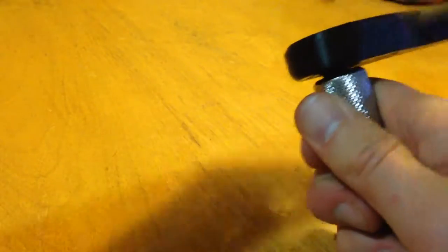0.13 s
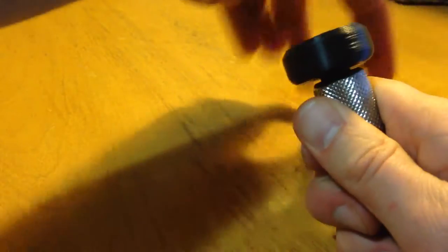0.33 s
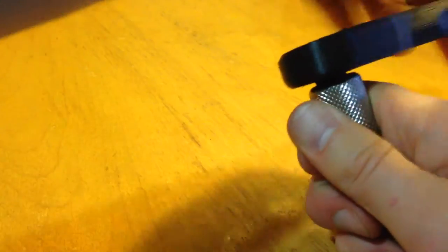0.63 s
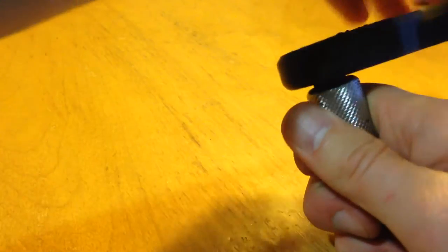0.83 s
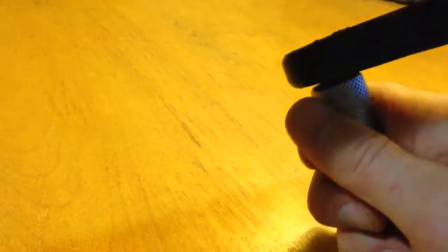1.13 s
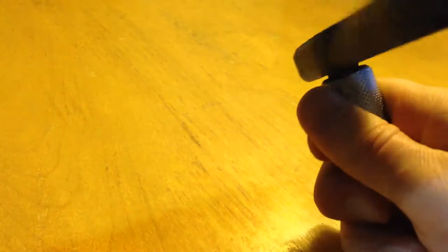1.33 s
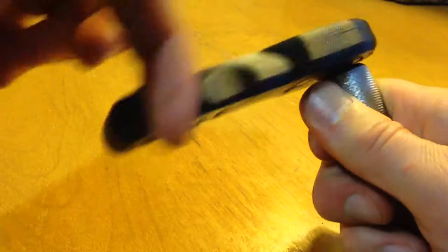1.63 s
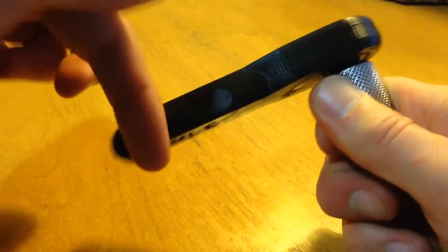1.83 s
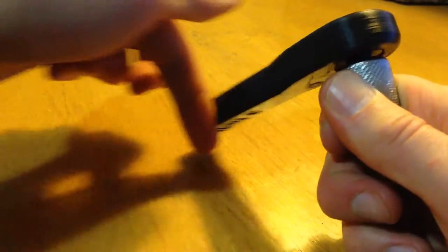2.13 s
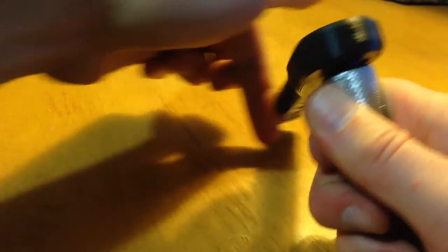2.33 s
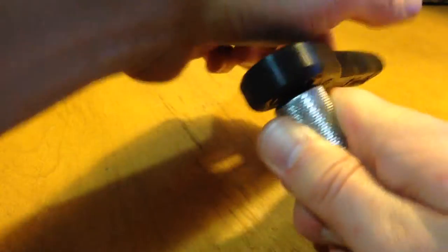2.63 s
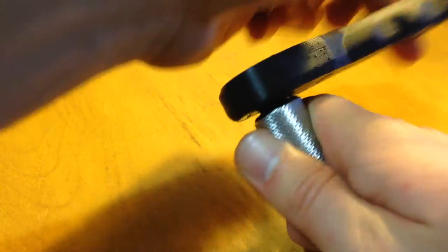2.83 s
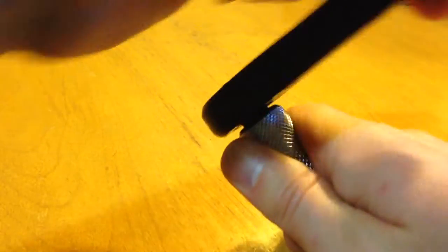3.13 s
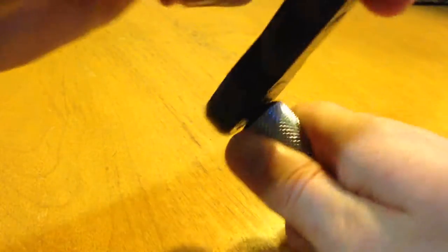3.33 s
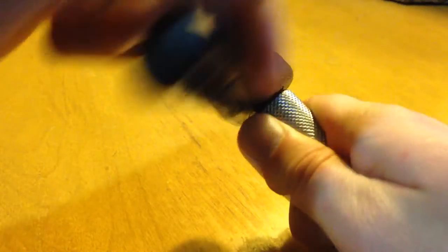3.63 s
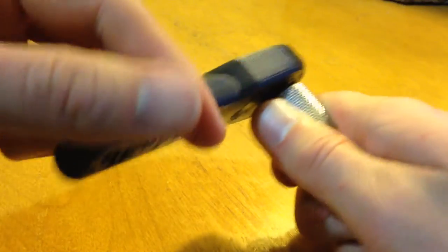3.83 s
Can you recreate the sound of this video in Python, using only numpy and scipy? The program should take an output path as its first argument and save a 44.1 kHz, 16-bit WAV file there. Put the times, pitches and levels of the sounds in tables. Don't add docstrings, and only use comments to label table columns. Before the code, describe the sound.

A hand-turned plastic ratchet wrench rattles softly, then snaps a few isolated, bright clicks close up

```python
import sys
import numpy as np
from scipy import signal
from scipy.fft import rfft, irfft, next_fast_len
from scipy.io import wavfile
from scipy.ndimage import uniform_filter1d, map_coordinates

SR = 44100
rng = np.random.default_rng(int(sys.argv[2]) if len(sys.argv) > 2 else 0)


def digitize_waveform(pressure):
    field = np.atleast_2d(pressure).T
    bounded = np.clip(field, -1, 1)
    quanta = np.round(bounded * 32767).astype(np.int16)
    wavfile.write(sys.argv[1], SR, quanta)


def gain_from_decibels(decibels):
    exponent = np.asarray(decibels, float) / 20
    return 10 ** exponent


N = 176400

# (frequency [Hz], density [dB per Hz])
HISS_COLOUR = [(250, 0.5), (400, -2), (630, -9), (1000, -11.5), (2000, -18.5), (3200, -26), (6000, -30),
               (15500, -38.5)]
# (frequency [Hz], width [Hz], level [dB])
HUM = [(50, 16, -68.5), (83.9, 22, -71.5), (151, 20, -61.5), (220.6, 8.3, -64.5), (373, 22, -71),
       (977, 20, -78), (1610, 36, -84.5)]
# (time [s], level [dB])
DRONE = [(0, -76), (.15, -72), (.21, -50.5), (.36, -53.5), (.5, -59), (1.1, -68.5), (1.4, -57.5),
         (1.78, -69), (2.08, -58), (2.16, -67), (2.48, -57), (2.6, -64.5), (3.07, -56), (3.14, -67.5),
         (3.34, -57), (3.87, -74), (4, -62)]
# (frequency [Hz], t60 [s])
ROOM_DECAY = [(500, .25), (1500, 0.24), (4000, 0.23), (8000, .25), (15000, .2)]
# (frequency [Hz], level [dB])
ROOM_COLOUR = [(400, -2), (1500, 6.5), (5000, 9.5), (10000, 3.5), (15000, 3.5)]
# (time [s], level [dB])
THUMPS = [
    (0.188, -53),
    (2.454, -42),
    (3.021, -49.5),
    (3.698, -48),
]
# (frequency [Hz], width [Hz], level [dB])
BODY = [(787, 520, -12), (1400, 320, -7.5), (2190, 280, -3.5), (3400, 620, -5.5), (4500, 700, -4.5),
        (5500, 800, -4.5), (6500, 270, 2), (6540, 440, -8), (8400, 900, -6.5), (9430, 810, -11),
        (10360, 530, -14), (13100, 1500, -28.5), (14600, 1500, -28)]
# (time [s], level [dB])
RUB = [(0, -54), (.1, -60.5), (.25, -59), (.33, -66.5), (.38, -85), (.51, -85), (.55, -62), (.6, -79),
       (.7, -100), (3.65, -98), (3.679, -61.5), (3.7, -92)]
# (frequency [Hz], width [Hz], level [dB])
SCUFF = [(880, 350, -2), (1300, 300, -10), (1800, 400, -6.5), (5200, 340, -4)]
CORE_HZ = 3770, 3620, 6350, 5400
# (time [s], level [dB], t60 [s])
CORE_RINGS = [
    [(.55, -62, .1), (.565, -64, .1), (.622, -55, .3)],
    [(1.915, -80, .3), (1.975, -78, .15), (2.005, -79, .2), (2.456, -53, .2), (2.9795, -26, .04),
     (2.9856, -31, .04), (3.035, -58, .15), (3.6876, -22, .022)],
    [(1.905, -75, .1), (2.005, -73, .15), (2.46, -60, .15), (3.71, -62, .3)],
    [(3.035, -57, .3)],
]
# (frequency [Hz], level [dB], t60 [s])
LOOSE_RING = [
    (5170, -21, .05),
    (2850, -24, .07),
    (1170, -22, .07),
]
# (time [s], level [dB], chatter length [s], leading resonance [Hz], tilt [dB per octave])
TOUCHES = [(.462, -66.5, 0.0059, 6500, 1), (.532, -70, 0.0055, 4940, 0), (.545, -58, .004, 2600, -6),
           (.550, -54, .008, 5200, -2), (.564, -54, 0.007, 6900, -4), (.716, -74, 0.0069, 6040, 6),
           (1.116, -68, 0.004, 6000, 4), (1.706, -74, .016, 12500, 4), (1.885, -78, .008, 6300, 0),
           (1.92, -77, 0.014, 6300, 6), (1.978, -77, .006, 5500, 0), (2.005, -73.5, .02, 6300, 0),
           (2.132, -76.5, .006, 6200, 6), (2.425, -72, .012, 6800, 0), (2.44, -64, 0.01, 8500, -3.5),
           (3.238, -69, 0.0019, 6000, -6), (3.814, -62, 0.0037, 12000, 4)]
# (time [s], level [dB], chatter length [s], leading resonance [Hz], tilt [dB per octave])
KNOCKS = [(.547, -57, 0.0094, 645, -1), (.615, -50, .016, 650, -13), (1.1155, -55, 0.005, 1050, -10),
          (1.122, -63, .03, 950, -10), (2.451, -36, .002, 2400, -7), (2.452, -49, .004, 700, -7),
          (2.458, -47, .006, 1400, -7), (3.0305, -41, 0.0035, 1400, -4), (3.694, -42, .011, 1300, -7),
          (3.699, -30, 0.002, 2000, -7), (3.739, -50, 0.004, 1450, 9)]
# (time [s], level [dB], chatter length [s], leading resonance [Hz])
RATTLE = [(.001, -50, 0.017, 5200), (.008, -54, 0.0041, 3180), (0.0155, -45, 0.005, 880),
          (0.017, -45, 0.003, 1810), (.018, -43, .003, 5600), (.052, -51, 0.005, 5200),
          (.0555, -47, .003, 3700), (0.0565, -43, 0.002, 7000), (0.059, -47, 0.006, 820),
          (.064, -55, .003, 5500), (0.093, -53, 0.005, 4240), (.094, -56.5, .004, 7500),
          (.095, -57.5, 0.0029, 2900), (.105, -54, 0.0062, 1200), (.106, -57, .005, 5000),
          (.112, -64, 0.0094, 1190), (0.133, -53.5, 0.0058, 5300), (.136, -57, .008, 1300),
          (.144, -56, .007, 5000), (0.153, -55, 0.0081, 4750), (0.187, -52.5, 0.005, 5300),
          (.188, -57, .005, 2860), (.2, -54, .004, 6000), (0.199, -53.5, .012, 1150),
          (0.208, -54, .005, 5000), (0.229, -52, 0.008, 5080), (.236, -53, 0.015, 2860),
          (.242, -53, .006, 5100), (.25, -58, .008, 5100), (.271, -58, .006, 7300),
          (.272, -52, 0.0061, 2880), (.277, -57, .008, 1150), (.284, -59, .01, 7400),
          (0.288, -59, 0.005, 2870), (.294, -61, .006, 5100), (0.316, -63.5, 0.005, 2740),
          (.332, -66, .008, 7500)]
# (time [s], level [dB], chatter length [s], leading resonance [Hz], tilt [dB per octave])
SNAPS = [(.6142, -42, 0.0048, 2700, -9), (.6158, -36.5, .002, 4900, -11), (.6168, -32, 0.0054, 3700, -9),
         (.6170, -36, .0035, 3000, -9.5), (.6215, -45, .012, 6960, -8), (.626, -45, 0.0087, 4250, -6),
         (2.4507, -23, 0.00092, 6640, -0.5), (2.4510, -28, .001, 8550, 1),
         (2.4518, -20.5, 0.0013, 4910, -2.5), (2.4538, -30, .0012, 4230, 1.5),
         (2.455, -30, 0.003, 3400, 1.5), (2.4578, -30, .001, 3410, 4), (2.460, -42.5, 0.0091, 4500, -1),
         (2.9787, -33, .0008, 5900, 7), (2.9795, -32, 0.004, 3540, -13.5),
         (2.9852, -27.5, 0.0027, 6020, -0.5), (2.9855, -37, .005, 3630, -5),
         (3.0243, -27, 0.0011, 5190, -5.5), (3.0252, -12, 0.00027, 5360, 2),
         (3.0256, -18, 0.00062, 8400, -1), (3.0263, -25.5, 0.0014, 3440, 2), (3.0275, -26, 0.002, 5990, 1),
         (3.030, -29, 0.0031, 5350, 1), (3.0312, -22.5, 0.00093, 3380, 2.5),
         (3.0325, -31, 0.0041, 2083, 1.5), (3.6755, -58.5, 0.0014, 3510, 4),
         (3.6862, -45.5, 0.0011, 5030, 8), (3.6872, -24.5, 0.00053, 5114, 7),
         (3.6876, -30, 0.0032, 3550, -12), (3.691, -34, 0.0008, 6880, -1), (3.6925, -25, 0.0013, 6500, 4),
         (3.6975, -32.5, 0.001, 2983, 2), (3.6987, -15.5, 0.00043, 7610, 6),
         (3.6990, -16, 0.00096, 10130, 4.5), (3.6993, -16, 0.0012, 3214, -1.5),
         (3.7003, -25.5, 0.0013, 6320, -1), (3.702, -32.5, .003, 5500, 6), (3.708, -39.5, 0.006, 6500, 6),
         (3.7135, -43, .002, 3290, 1)]

HISS_DB, HISS_SWELL_DB, HUM_SWELL_DB = -62.5, 0.25, 3.5
DRONE_HZ, DRONE_WIDTH_HZ = 94, 8.3
ROOM_DB, ROOM_DELAY_S = -21.5, 0.005
THUMP_HZ, THUMP_T60_S = 105, 0.12
RUB_HISS_DB = -19
SPIKE_DB, DROOP_DB = 0.5, 4.5
FALL_S = 0.0007
MODE_SCATTER_DB = 1.5
RATTLE_TILT_DB = -2.5
SOFT_BLOW_DB = -6
SHADE_HZ, SHADE_WIDTH_HZ, SHADE = 12400, 3300, 0.53
TOP_HZ = 15400


def unit(x):
    return x / np.sqrt(np.mean(x ** 2) + 1e-20)


def along(points, hz):
    f, value = np.transpose(points)
    return np.interp(np.log(hz + 1), np.log(f + 1), value)


def wobble(rate):
    knots = rng.standard_normal(int(N * rate / SR) + 4)
    return map_coordinates(knots, [np.arange(N) * rate / SR])


def filtered(x, response):
    m = next_fast_len(len(x) + 4096)
    spectrum = rfft(x, m) * response(np.fft.rfftfreq(m, 1 / SR))
    return irfft(spectrum, m)[..., :len(x)]


def peak(f, hz, width):
    return 1j * f * width / (hz * hz - f * f + 1j * f * width)


def background():
    colour = [(30, -29.5), (200, -4.0)] + list(HISS_COLOUR)
    hiss = unit(filtered(rng.standard_normal(N), lambda f: gain_from_decibels(along(colour, f))))
    out = gain_from_decibels(HISS_DB + HISS_SWELL_DB * wobble(2.1)) * hiss
    for hz, width, db in HUM:
        band = filtered(rng.standard_normal(N), lambda f: peak(f, hz, 2.2 * width) ** 2)
        out += gain_from_decibels(db + HUM_SWELL_DB * wobble(2.5)) * unit(band)
    return out


def drone():
    t = np.arange(N) / SR
    phase = 2 * np.pi * np.cumsum(DRONE_HZ + DRONE_WIDTH_HZ / 2 * wobble(15)) / SR
    level_db = np.interp(t, *np.transpose(DRONE)) + 2.3 * wobble(17)
    return gain_from_decibels(level_db) * np.sqrt(2) * np.sin(phase)


def room(x):
    out, step = np.zeros(N + SR), SR // 2
    for at in range(0, N, step):
        hz, t, z = signal.stft(rng.standard_normal(step), SR, nperseg=256)
        decay_db = -60 * t / along(ROOM_DECAY, hz)[:, None]
        tail_db = decay_db + along(ROOM_COLOUR, hz)[:, None]
        tail = signal.istft(z * gain_from_decibels(tail_db), SR, nperseg=256)[1]
        wet = signal.fftconvolve(x[at:at + step], tail / np.linalg.norm(tail))
        view = out[at + round(ROOM_DELAY_S * SR):][:len(wet)]
        view += wet[:len(view)]
    return gain_from_decibels(ROOM_DB) * out[:N]


def thumps():
    t = np.arange(N) / SR
    out = np.zeros(N)
    for s, db in THUMPS:
        fade = gain_from_decibels(db - 60 * np.abs(t - s) / THUMP_T60_S) * (t > s)
        out += fade * np.sin(2 * np.pi * THUMP_HZ * (t - s))
    return out


def body(f, change_db=0):
    total = 0
    for k, ((hz, width, db), change) in enumerate(zip(BODY, change_db + np.zeros(len(BODY)))):
        total = total + (-1) ** k * gain_from_decibels(db + change) * peak(f, hz, width)
    return total


def rubbing():
    def colour(f):
        scuff = sum(gain_from_decibels(db) * np.abs(peak(f, hz, width)) for hz, width, db in SCUFF)
        return np.abs(body(f)) + scuff + gain_from_decibels(RUB_HISS_DB) * f / 9000

    level_db = np.interp(np.arange(N) / SR, *np.transpose(RUB))
    level_db = level_db + 3.0 * wobble(82) + 2.2 * wobble(400)
    return gain_from_decibels(level_db) * unit(filtered(rng.standard_normal(N), colour))


def core():
    t = np.arange(N) / SR
    out = np.zeros(N)
    for hz, rows in zip(CORE_HZ, CORE_RINGS):
        fade = sum(gain_from_decibels(db - 60 * np.abs(t - s) / t60) * (t > s) for s, db, t60 in rows)
        tone = np.sin(2 * np.pi * hz * t + 0.8 * wobble(60))
        out += fade * gain_from_decibels(3.0 * wobble(47)) * tone
    return out


def steel(x, modes):
    def response(f):
        return sum(gain_from_decibels(db + 28.0) * peak(f, hz, np.log(1000) / np.pi / t60) for hz, db, t60 in modes)

    return filtered(x, response)


def contacts(rows, lead_db, lead_q, rise_s, blow_db, order=1):
    out, t = np.zeros((4, N + SR)), np.arange(2048) / SR
    mode_hz, width, mode_db = np.transpose(BODY)
    for k, (s, db, length, hz, tilt_db) in enumerate(rows):
        droop = gain_from_decibels(-DROOP_DB * np.clip(t / length, 0, 1))
        fall = np.exp(-np.clip(t - length, 0, 1) / FALL_S)
        shape = np.clip(t / rise_s, 0, 1) * droop * fall
        spikes = rng.standard_normal(len(t)) * gain_from_decibels(SPIKE_DB * rng.standard_normal(len(t)))
        chatter = shape * spikes
        chatter[0] = gain_from_decibels(blow_db)

        dull_db = tilt_db * np.log2(np.maximum(mode_hz / 3000, 1))
        all_hz, all_width = np.append(mode_hz, hz), np.append(width, hz / lead_q)
        modes = filtered(chatter, lambda f: peak(f, all_hz[:, None], all_width[:, None]) ** order)
        scatter_db = MODE_SCATTER_DB * rng.standard_normal(len(modes))
        size = gain_from_decibels(np.append(mode_db + dull_db, lead_db) + scatter_db)
        size *= np.sqrt(all_width) * (-1) ** np.arange(len(modes)) / np.linalg.norm(modes, axis=1)
        ring = size @ modes

        click = 1.0 * (t == t[64])
        even = filtered(click, lambda f: np.sqrt(
            uniform_filter1d(np.abs(body(f, dull_db)) ** 2, size=200)))

        pair = np.array([ring / np.linalg.norm(ring), even / np.linalg.norm(even)])
        start = round(s * SR)
        gain = gain_from_decibels(db) * np.sqrt((length + FALL_S) * SR)
        out[[0, 1 + k % 3], start:start + len(t)] += gain * pair
    return out[:, :N]


def rattle():
    rows = [row + (RATTLE_TILT_DB,) for row in RATTLE]
    return contacts(rows, lead_db=12.5, lead_q=10.3, rise_s=0.00088, blow_db=SOFT_BLOW_DB)


def hand():
    touches = contacts(TOUCHES, lead_db=1.0, lead_q=6.8, rise_s=0.0016, blow_db=-1)
    return touches + contacts(KNOCKS, lead_db=35, lead_q=2.0, rise_s=0.002,
                              blow_db=SOFT_BLOW_DB, order=2)


def pawl():
    return contacts(SNAPS, lead_db=11.0, lead_q=9.5, rise_s=0.00014, blow_db=12.5)


def scene():
    loose = rattle()
    near, *far = pawl() + loose + hand()
    wrench = near + rubbing() + core() + steel(loose[0], LOOSE_RING)
    wrench = wrench + sum(map(room, far))
    wrench = filtered(wrench, lambda f: 1 - SHADE * peak(f, SHADE_HZ, SHADE_WIDTH_HZ))
    return (wrench + thumps() + drone() + background())[None]


def low_pass(x):
    return signal.sosfilt(signal.butter(12, 16450, fs=SR, output="sos"), x)


def record(dry):
    def band(f):
        return (f < 16500) * gain_from_decibels(-30.0 * np.clip((f - TOP_HZ) / 710.0, 0, 1))

    limited = filtered(dry[0], band)
    return low_pass(limited[None])


dry = scene()
out = record(dry)
digitize_waveform(out)
```